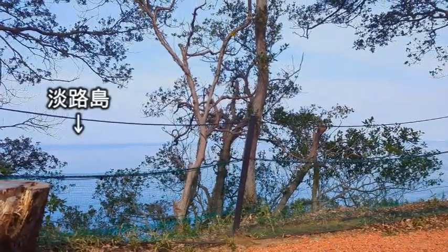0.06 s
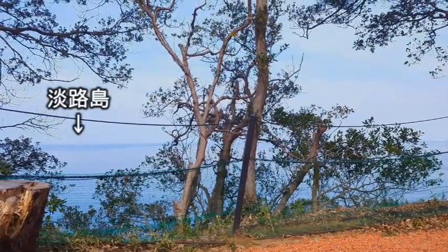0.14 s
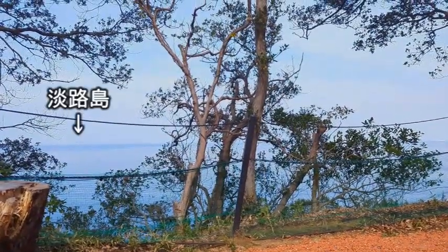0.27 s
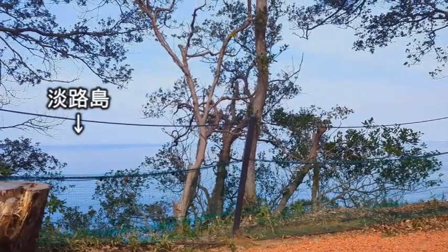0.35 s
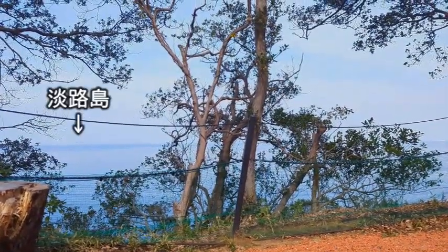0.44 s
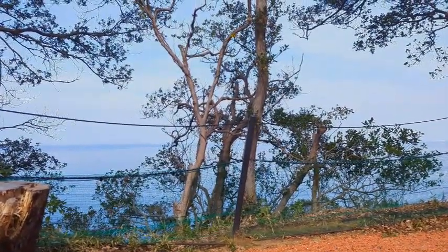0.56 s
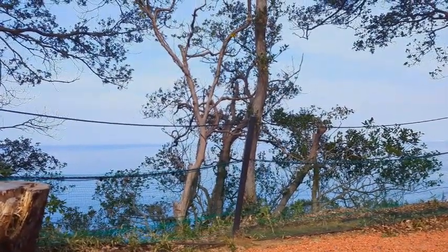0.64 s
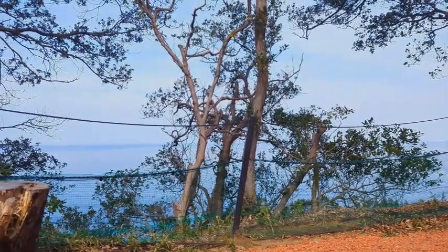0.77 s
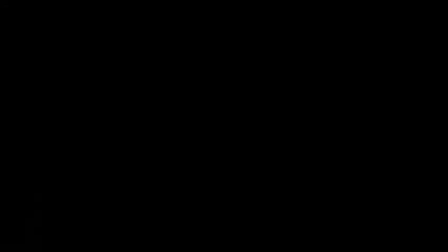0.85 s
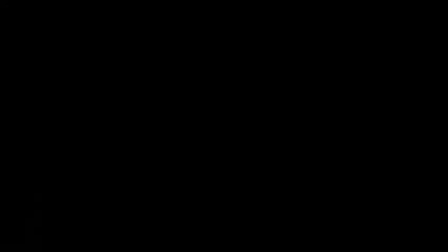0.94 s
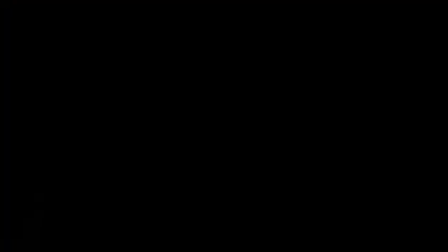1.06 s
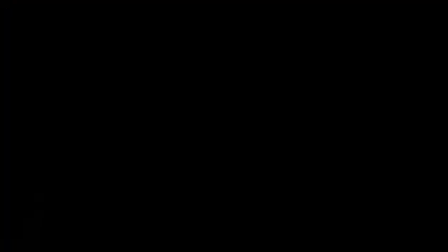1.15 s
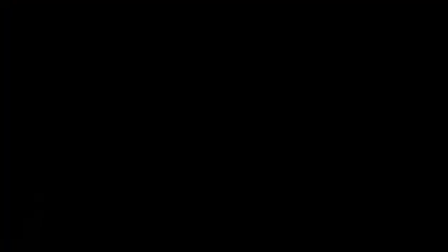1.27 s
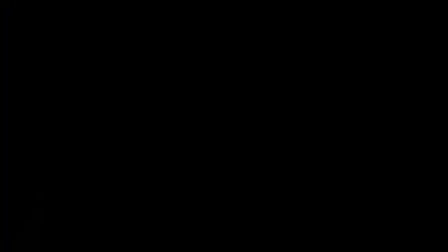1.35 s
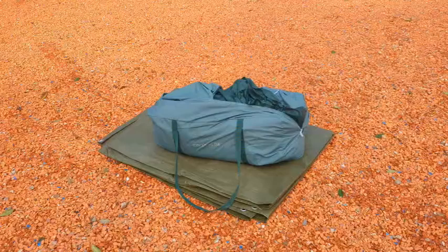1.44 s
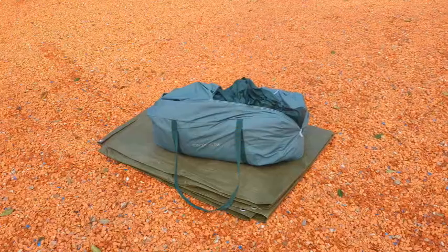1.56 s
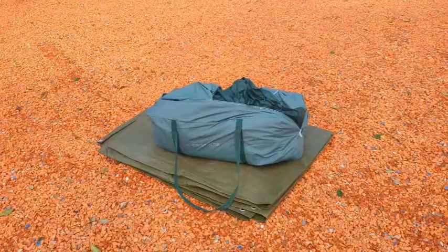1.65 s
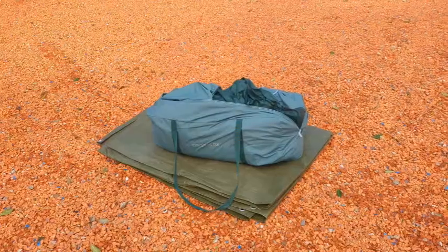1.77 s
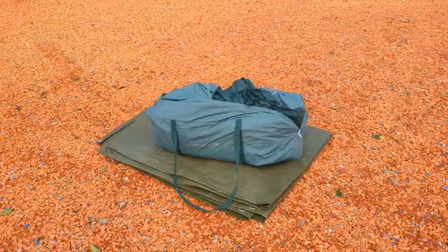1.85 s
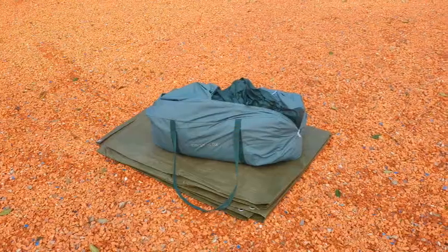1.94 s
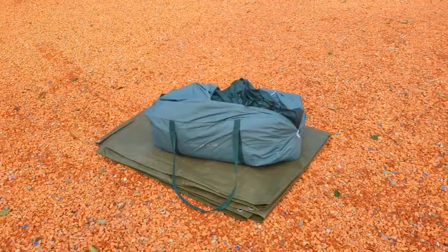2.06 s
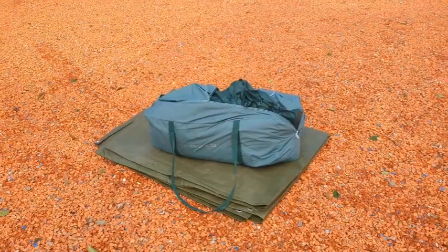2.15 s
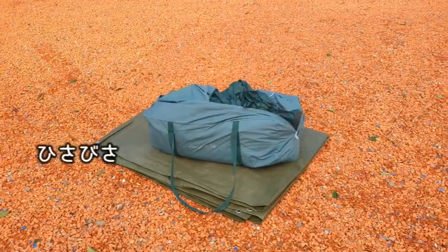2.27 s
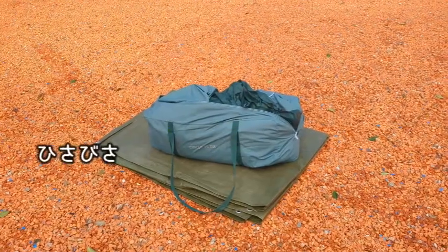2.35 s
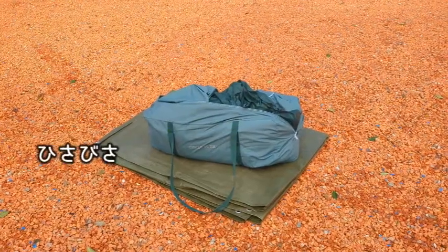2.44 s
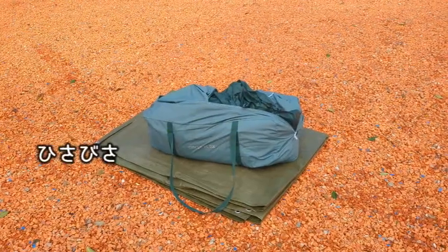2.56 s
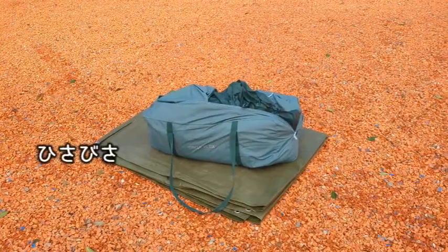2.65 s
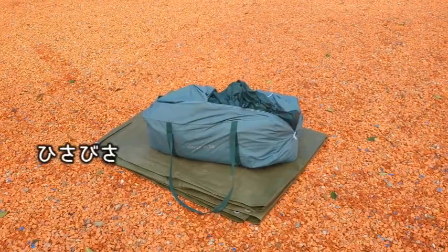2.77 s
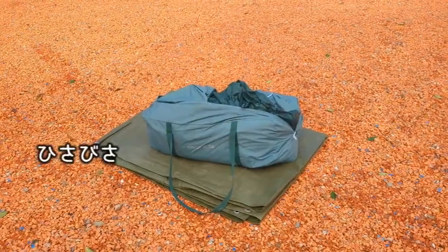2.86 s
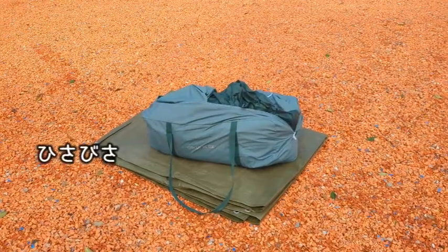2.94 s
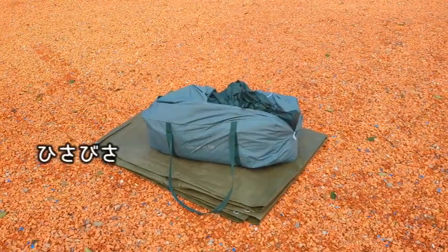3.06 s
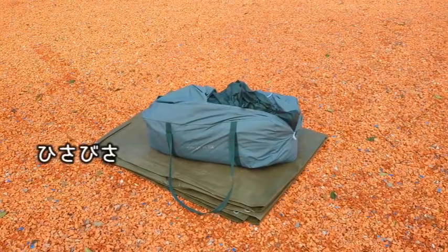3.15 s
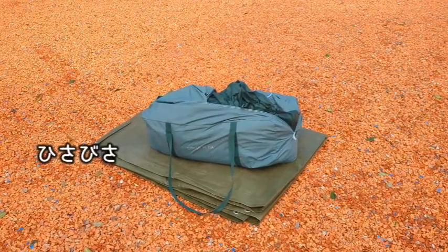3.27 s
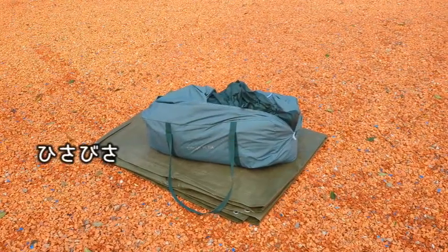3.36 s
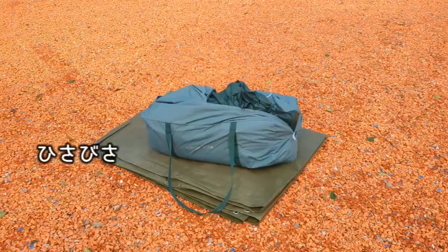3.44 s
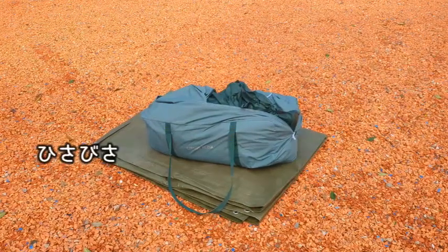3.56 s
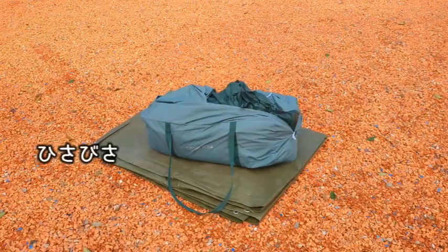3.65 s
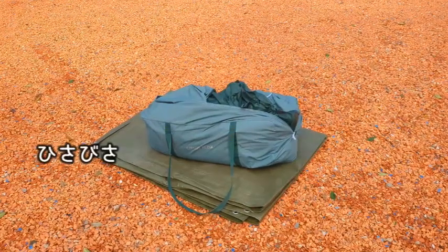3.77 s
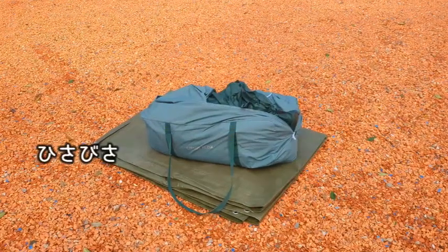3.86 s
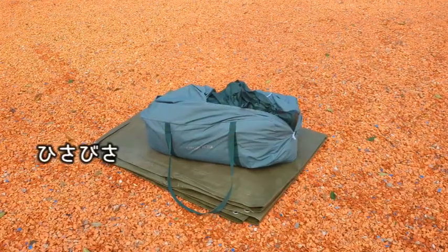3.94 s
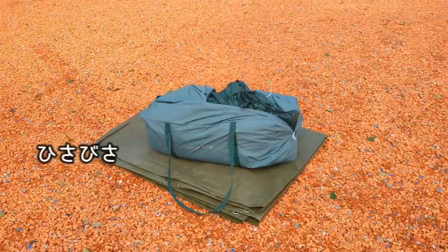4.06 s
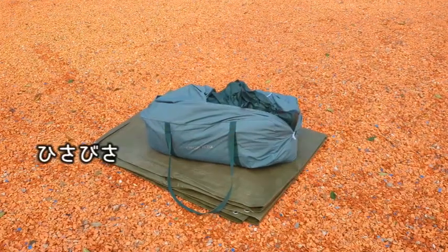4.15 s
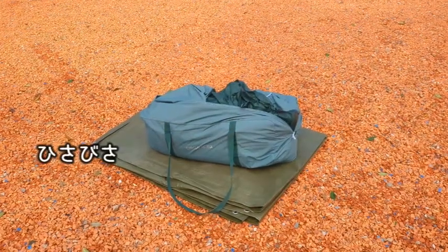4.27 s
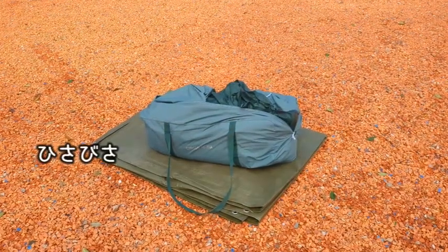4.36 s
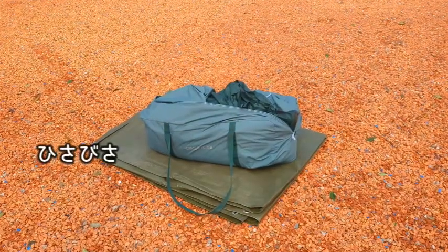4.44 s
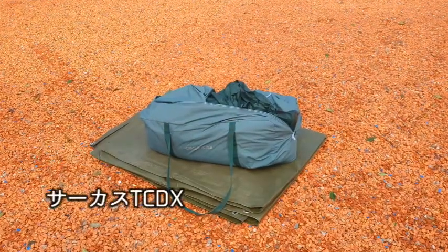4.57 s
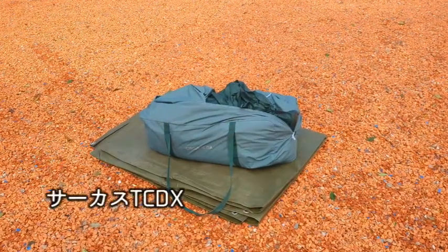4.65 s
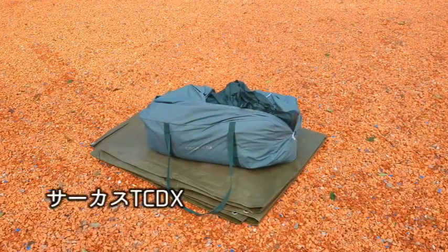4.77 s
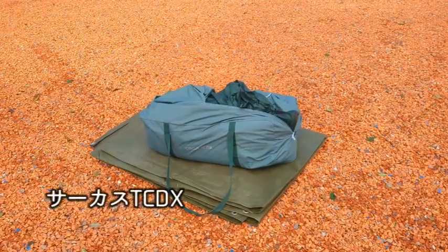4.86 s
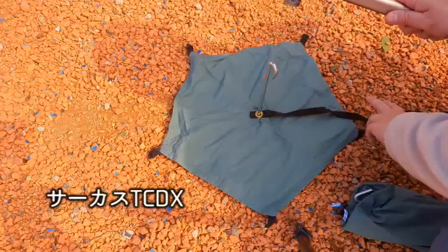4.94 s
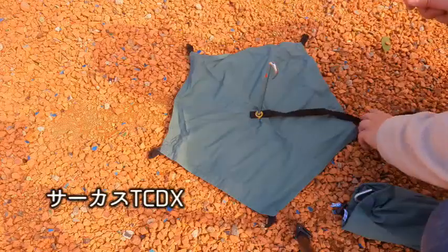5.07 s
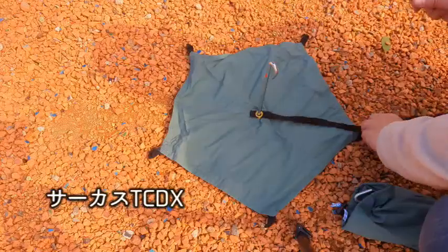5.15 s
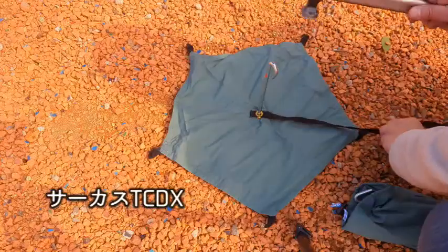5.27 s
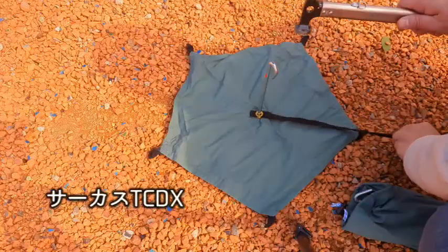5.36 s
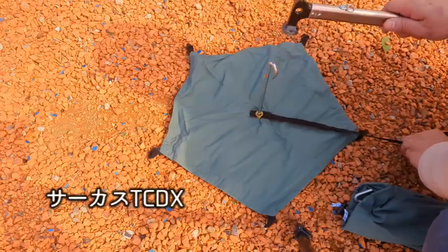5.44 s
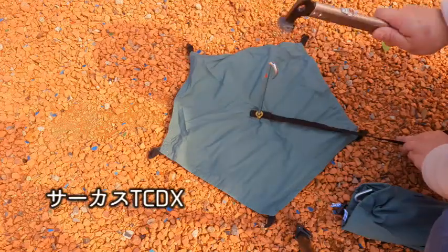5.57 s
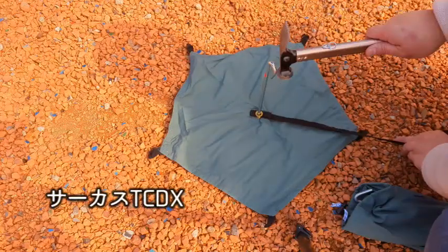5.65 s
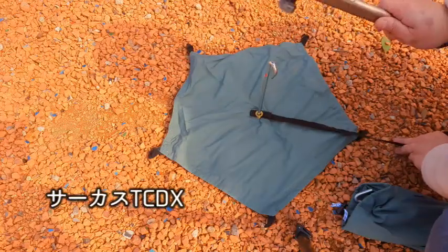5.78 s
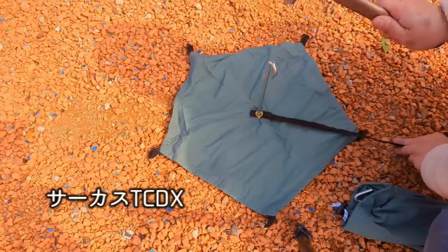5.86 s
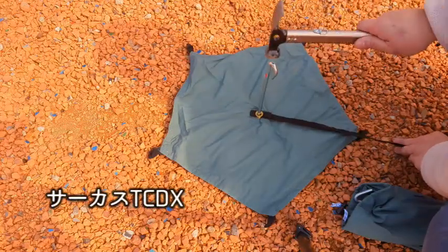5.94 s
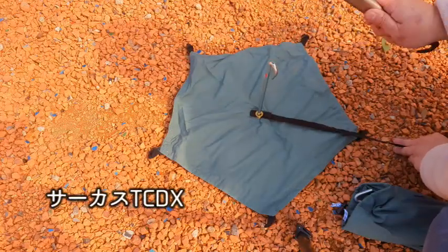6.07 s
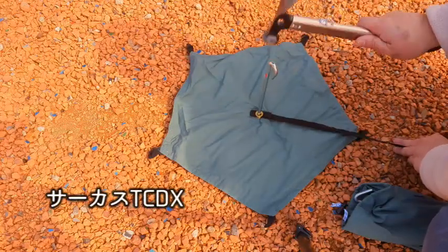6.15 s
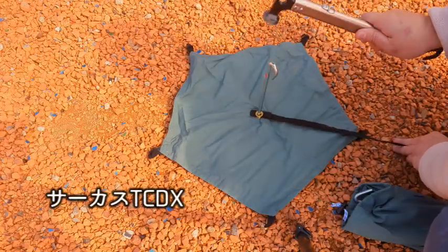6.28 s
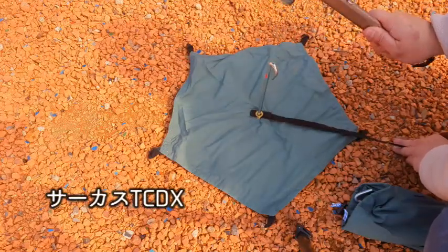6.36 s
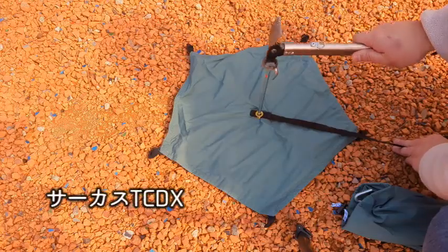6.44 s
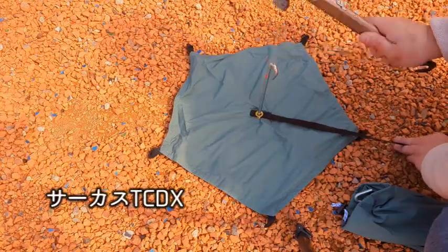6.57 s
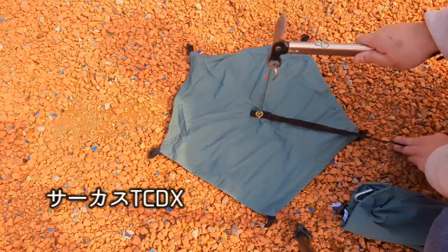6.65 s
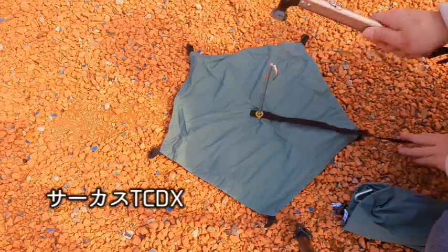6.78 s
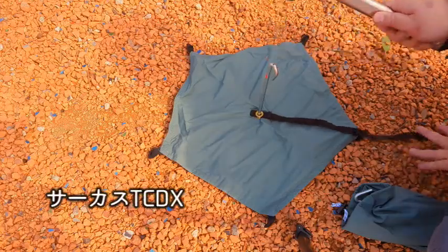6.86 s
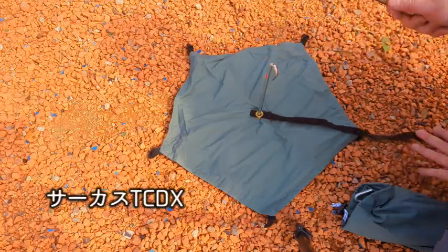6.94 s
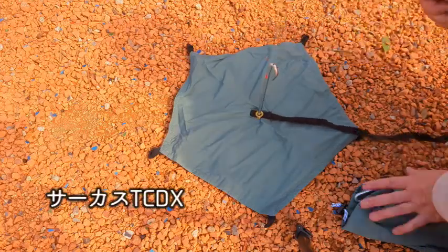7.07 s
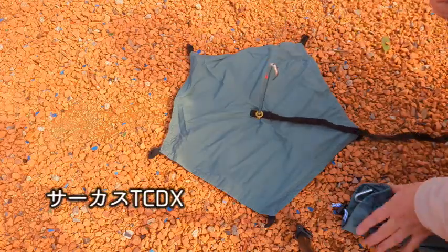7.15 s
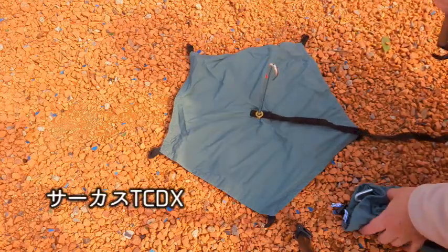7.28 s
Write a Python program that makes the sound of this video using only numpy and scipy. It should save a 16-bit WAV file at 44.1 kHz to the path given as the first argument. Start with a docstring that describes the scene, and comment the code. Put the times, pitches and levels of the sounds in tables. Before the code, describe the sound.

A steel hammer drives a tent peg into gravel with five quick ringing clinks, after a low distant engine hum and soft knocks outdoors.

```python
"""Pitching a tent by the sea

Distant air, a short silence, then a low engine drone with a few soft knocks and faint far-off hoots.
A steel hammer touches a tent peg once and drives it into gravel with five blows. The peg's ring is
choked as it sinks, while the hard ping of the steel grows. Ground and trees scatter each clink,
pebbles tick, and a strap rustles over the gravel."""
import sys
import numpy as np
from scipy import signal
from scipy.fft import rfft, irfft
from scipy.io import wavfile

SR = 44100
rng = np.random.default_rng(int(sys.argv[2]) if len(sys.argv) > 2 else 0)


def file_out(sig):
    """Save sig as 16-bit WAV at sys.argv[1]."""
    # one column per channel
    cols = np.atleast_2d(sig).T
    # limit, then scale
    lim = np.clip(cols, -1, 1)
    pcm = np.round(lim * 32767).astype(np.int16)
    wavfile.write(sys.argv[1], SR, pcm)


N = 322371
TIME = np.arange(N) / SR
AGE = np.arange(int(.7 * SR)) / SR  # seconds since a hit

# The noise of steel meeting steel. Each row: frequency in Hz, level in dB.
STEEL_CRACK = [(1200, -15.5), (2000, -11.5), (3200, 2.5), (4500, -2), (5300, 6.5), (5800, -5), (6600, 0),
               (8700, 0.5), (9700, -8), (13500, -7.5), (15000, -8.5), (16000, -13)]
# The noise of stones jolted around the peg. Each row: frequency in Hz, level in dB.
STONE_CRUNCH = [(100, -16), (270, 1), (400, -1), (570, -5.5), (1000, 0.5), (1270, -3.5), (1600, -0.5),
                (2300, -15), (5000, -12.5)]


def undb(db):
    """Turn decibels into a number to multiply by."""
    return 10 ** (np.asarray(db) / 20)


def between(ends, share):
    """The value a share of the way from the first end to the second."""
    return ends[0] + (ends[1] - ends[0]) * share


def flicker(rate):
    """A random wander of size about 1 that turns rate times a second."""
    return np.interp(TIME * rate, np.arange(N), rng.standard_normal(N))


def fade(t60):
    """Die away after a hit, by 60 dB in t60 seconds."""
    return np.exp(-np.log(1000) * AGE / t60)


def span(start, end, rise, fall):
    """Fade in from start and be silent again at end, all in seconds."""
    return np.clip((TIME - start) / rise, 0, 1) * np.clip((end - TIME) / fall, 0, 1)


def swell(start, length, rise_share=.44, release_s=.013):
    """Build up over a share of the length, hold, then die away."""
    build = np.clip((TIME - start) / (rise_share * length), 0, 1)
    return build * np.exp(-np.maximum(TIME - start - length, 0) / release_s)


def add(out, start, sound):
    """Mix a short sound into out at start seconds."""
    i = int(start * SR)
    out[:, i:i + len(AGE)] += sound[..., :N - i]


def colour(points, hz):
    """How strong a frequency is on a curve drawn through (Hz, dB) points."""
    point_hz, db = np.transpose(points)
    return undb(np.interp(np.log(hz + 1), np.log(point_hz), db))


def tint(x, points):
    """Filter a sound to the colour of the (Hz, dB) points."""
    size = x.shape[-1]
    cepstrum = irfft(np.log(colour(points, np.fft.rfftfreq(size, 1 / SR))), size)
    # fold the filter forward in time, so nothing sounds before the hit
    cepstrum[1:size // 2] *= 2
    cepstrum[size // 2:] = 0
    return irfft(rfft(x) * np.exp(rfft(cepstrum)), size)


def noise(points, bass_spread=.1, apart_hz=2500):
    """Steady coloured noise of size 1; left and right are alike in the bass, unrelated in the treble."""
    hz = np.fft.rfftfreq(N, 1 / SR)
    mid, side = rfft(rng.standard_normal((2, N)))
    spread = np.clip(hz / apart_hz, bass_spread, 1)
    stereo = mid + np.array([[1], [-1]]) * spread * side
    x = irfft(stereo * colour(points, hz), N)
    return x / x.std()


def burst(points, t60, spread):
    """A short flurry of contacts, coloured by what is struck; spread sets the stereo width."""
    mid, side = rng.standard_normal((2, len(AGE))) * fade(t60)
    flurry = (mid + np.array([[spread], [-spread]]) * side) / np.hypot(1, spread)
    gains = colour(points, np.fft.rfftfreq(len(AGE), 1 / SR))
    return tint(flurry, points) / np.sqrt(np.mean(gains ** 2))


def air():
    """Low rumble and a faint hush of sea and leaves: at the shore, at the tent site, then at the peg."""
    # The colour of the air at each spot. Each row: frequency in Hz, relative level in dB.
    shore_colour = [(15, -51), (25, -43), (42, -8), (66, 0), (95, -9), (131, -3.5), (172, -22.5),
                    (243, -25.5), (335, -32.5), (673, -39.5), (729, -42.5), (1580, -44.5), (1910, -41.5),
                    (5280, -53), (15000, -73.5)]
    site_colour = [(20, -46), (30, -15), (42, -9), (58, 8.5), (80, -5), (120, -2.5), (170, -13), (300, -26),
                   (600, -37.5), (1300, -43), (2300, -42.5), (3200, -50), (6000, -56), (10000, -64.5),
                   (15000, -70.5)]
    peg_colour = [(20, -38.5), (30, -21), (42, -5), (60, 10.5), (85, -1), (120, 6), (180, -18),
                  (300, -23.5), (600, -31), (1300, -38), (2500, -38.5), (4500, -44.5), (9000, -49),
                  (15000, -58.5)]
    shore = undb(-46.5) * noise(shore_colour, bass_spread=.31)
    site = leaves() + undb(-44) * noise(site_colour, bass_spread=.39)
    peg = undb(-46) * noise(peg_colour, bass_spread=.28)
    shore *= span(-.0091, .85, rise=.011, fall=.0057)
    site *= span(1.45, 4.91, rise=.099, fall=.023)
    peg *= span(4.87, 7.5, rise=.029, fall=.02)
    return (shore + site + peg) * undb(.5 * flicker(rate=6))


def leaves(rise_s=.17, fall_s=.33):
    """Gusts stir the leaves; each rises quickly and dies away slowly."""
    # The hiss of leaves. Each row: frequency in Hz, level in dB.
    leaf_colour = [(1000, -24.5), (1900, -2), (2300, 1), (2650, -3), (3100, -19.5), (8000, -34.5)]
    # Gusts of wind. Each row: time of the peak in seconds, level in dB.
    gusts = [(1.5, -74), (2.401, -74), (3.85, -74.5)]
    wind = 0
    for peak, db in gusts:
        width = np.where(TIME < peak, rise_s, fall_s)
        wind += undb(db) * np.exp(-((TIME - peak) / width) ** 2 / 2)
    return wind * noise(leaf_colour)


def engine(firing_hz=(93.85, 91.8), second_db=(-15.5, -26.5), whine_hz=745):
    """A distant engine slows a little: a hum at its firing rate, one an octave up, and a thin whine."""
    # The hum's level, which dips briefly midway. Each row: time in seconds, level in dB.
    levels = [(1.55, -36.5), (3.17, -42.5), (3.21, -51), (3.29, -44.5), (4.35, -36), (4.85, -43)]
    level_db = np.interp(TIME, *np.transpose(levels))
    slowed = np.interp(TIME, (2.126, 3.2), (0, 1))  # moves each pair of settings from first to second
    phase = 2 * np.pi * np.cumsum(between(firing_hz, slowed)) / SR
    phase = phase + np.array([[0], [.11]])  # the right side is slightly ahead
    second = undb(between(second_db, slowed) + 2 * flicker(rate=21)) * np.sin(2 * phase)
    hum = np.sqrt(2) * undb(level_db + .55 * flicker(rate=9)) * (np.sin(phase) + second)
    whine_gain = undb(-78 + .82 * flicker(rate=11))
    whine = whine_gain * np.sin(2 * np.pi * np.cumsum(whine_hz + 9 * flicker(rate=17)) / SR)
    return (hum + whine) * span(1.45, 4.92, rise=.088, fall=.13)


def knock(points, t60, brightness_db=0, thud_hz=260):
    """A short rattle of contacts, tilted by brightness_db for each octave above the thud."""
    tilted = [(hz, db + brightness_db * np.log2(hz / thud_hz)) for hz, db in points]
    mid, side = rng.standard_normal((2, len(AGE))) * fade(t60)
    return tint(mid + np.array([[.5], [-.5]]) * side, tilted)


def thump(sweep_s, start_hz, end_hz, peak_sweeps):
    """A bass pulse that swells while its pitch drops, loudest after peak_sweeps times sweep_s."""
    hz = end_hz + (start_hz - end_hz) * np.exp(-AGE / sweep_s)
    progress = AGE / (peak_sweeps * sweep_s)
    return np.sin(2 * np.pi * np.cumsum(hz) / SR) * progress * np.exp(1 - progress)


def gear():
    """Camping gear is knocked softly, with a few heavy bumps close by; harder contacts are brighter."""
    # Soft knocks. Each row: start in seconds, level in dB, brightness in dB per octave.
    knocks = [(1.517, -35.5, -4.5), (1.562, -22.5, 0.1), (1.592, -46, 3), (1.666, -47, 3.5),
              (1.943, -47, 1), (1.985, -27, -6), (2.63, -56.5, 5), (2.679, -36, -8), (2.705, -40, -5.5),
              (3.483, -41, 0), (3.797, -47.5, 1.5), (4.151, -45, -0.5), (4.732, -44.5, .5),
              (7.129, -54.5, 7)]
    # The dull thud of a knock. Each row: frequency in Hz, level in dB.
    knock_colour = [(60, 7.5), (260, 20.5), (700, 2.5), (1200, -11), (2400, -9.5), (8500, -43),
                    (16000, -52)]
    # Heavy bumps. Each row: start in seconds, level in dB.
    bumps = [(1.565, -23), (1.985, -34), (2.701, -34.5)]
    out = np.zeros((2, N))
    for start, db, brightness_db in knocks:
        add(out, start, undb(db) * knock(knock_colour, t60=.03, brightness_db=brightness_db))
    bump = thump(sweep_s=.016, start_hz=150, end_hz=50.2, peak_sweeps=1.32)
    for start, db in bumps:
        add(out, start, undb([[db - 3], [db + 3]]) * bump)  # louder on the right
    return out


def hoots(waver_hz=8):
    """Soft, nearly pure calls swell and fade in the distance."""
    # Far-off calls. Each row: start in seconds, length in seconds, pitch in Hz, level in dB.
    calls = [(3.048, .05, 445, -62), (3.146, 0.057, 450, -67), (6.045, 0.026, 545, -62),
             (6.836, 0.093, 405, -64)]
    out = 0
    for start, length, hz, db in calls:
        phase = 2 * np.pi * np.cumsum(hz + waver_hz * flicker(rate=33)) / SR
        out += undb(db) * swell(start, length) * np.sin(phase)
    return out


def clink(range_db, grip_s, ring_stretch=1.073, choke_db=-13, choke_s=.02):
    """Steel hits steel with a ring and a crack; where the face lands sets how loud each range is."""
    # The centres of five ranges in Hz: peg tone, clank, overtone, ping, top ping.
    range_hz = [2643, 3150, 5250, 8300, 14700]
    # Peg and hammer ring together; the peg bends two ways, so its tone is a pair. Each row: pitch in Hz,
    # level in dB, fade time in seconds before ring_stretch, left minus right in dB.
    steel_tones = [(2640, -2, .42, -10), (2647, -13, .3, -4), (1900, -25, .08, 0), (4215, -13, .05, 0),
                   (3034, -5, .05, 2), (3137, 1, .052, 2), (3184, -13, .11, 2), (3678, -6, .055, 0),
                   (5210, 0, .05, -3), (5285, -6, .1, -6), (5923, -18, .06, 0), (7430, -14, .05, 0),
                   (6480, -3, .02, 0), (6860, -5, .022, 0), (8000, -4, .02, 3), (8990, -8, .025, 0),
                   (11580, -15, .035, 0), (8303, 0, .025, 3), (8557, 1, .025, 2), (8530, -27, .28, 2),
                   (13323, -16, .045, 0), (14662, 3, .035, 1), (14680, -25, .18, 0), (14840, -6, .028, 0),
                   (15334, -7, .033, 0)]
    strength = list(zip(range_hz, range_db))
    ring = 0
    for hz, db, t60, pan_db in steel_tones:
        hz += .5 * rng.standard_normal() / t60  # the most damped tones shift most from blow to blow
        # higher tones reach the two ears more out of step
        phase = 2 * np.pi * rng.random((2, 1)) * min((hz / 9000) ** 3, 1) + np.array([[0], [1]])
        gain = undb(db + np.array([[pan_db], [-pan_db]]) / 2) * colour(strength, hz)
        ring += gain * np.sin(2 * np.pi * hz * AGE + phase) * fade(t60 * ring_stretch)
    # the gravel closes on the shaft and chokes its ring
    grip = undb(choke_db * np.clip((AGE - grip_s) / choke_s + .5, 0, 1))
    crack = tint(burst(STEEL_CRACK, t60=.021, spread=1), strength[1:])
    return undb(3) * ring * grip, undb(11.5) * crack


def shaft_knock(hz):
    """The peg's shaft knocks against the soil, which stops it within a few cycles."""
    # The shaft's tones. Each row: multiple of its pitch, level in dB.
    shaft_tones = [(1.002, -1.5), (1.199, -1), (1.5, -2.5)]
    phase = 2 * np.pi * hz * AGE
    return sum(undb(db) * np.sin(multiple * phase) for multiple, db in shaft_tones) * fade(t60=.017)


def scatter(sound, tail_t60=.43, early_t60=.14, trees_s=.051):
    """Countless weak echoes from stones and plants, nearest first, with a cluster from a row of trees."""
    trees = undb(-8) * np.exp(-((AGE - trees_s) / .012) ** 2)
    sizes = rng.standard_normal((2, len(AGE))) * undb(4 * flicker(rate=830)[:len(AGE)])
    echoes = sizes * (fade(tail_t60) + undb(-3) * fade(early_t60) + trees) * (AGE > .004)
    echoes /= np.sqrt(np.sum(echoes ** 2) / 2)
    scattered = signal.fftconvolve(sound, echoes, axes=1)[:, :N]
    # small stones and leaves throw back mostly treble
    return tint(scattered, [(500, -1), (2600, 6.5), (4500, -1.5), (8000, -1), (15000, -2.5)])


def hammering(contact_s=.001):
    """Each blow rings the steel, knocks the shaft, crunches the gravel and thumps the ground."""
    # Hammer blows. Each row: start in seconds, force in dB, looseness of the peg from 0 to 1, levels of
    # peg tone, overtone and crunch in dB, seconds until the gravel grips, echo level in dB.
    blows = [(4.8853, -50, 0.8, -40.5, -93, -51, .09, -9), (5.643, -2, 0.99, -21.5, -30, -22.5, .062, -5.5),
             (5.9345, 0, 0.23, -25.5, -22, -32, 0.096, -2),
             (6.1805, -0.5, 0.05, -38.5, -31, -30, 0.14, 2.5),
             (6.418, -0.5, 0.02, -32.5, -18.5, -31.5, .11, 2.5),
             (6.657, -2.5, 0.04, -38.5, -30, -32, .135, 3)]
    direct, to_echo = np.zeros((2, 2, N))
    for start, force_db, loose, tone_db, overtone_db, crunch_db, grip_s, echo_db in blows:
        # each pair is (firm, loose): a firm peg pings and thumps, a loose one clanks and knocks
        clank_db = force_db + between((-27.5, -13.5), loose)
        ping_db = force_db + between((-18, -16), loose)
        top_ping_db = force_db + between((-12.5, -39), loose)
        shaft_db = force_db + between((-27.5, -13.5), loose)
        thump_db = force_db + between((-29.5, -32.5), loose)
        ring, crack = clink([tone_db, clank_db, overtone_db, ping_db, top_ping_db], grip_s)
        shaft = undb(shaft_db) * shaft_knock(hz=between((270, 563), loose))
        ground = shaft + undb(crunch_db + 5) * burst(STONE_CRUNCH, t60=.03, spread=.15)
        thud = undb(thump_db) * thump(sweep_s=.016, start_hz=213, end_hz=48.26, peak_sweeps=1.02)
        thrown = undb(-20) * ring + undb(-16) * crack + undb(-19.5) * ground
        add(direct, start, thud)
        add(direct, start + contact_s, ring + crack + ground)  # once the hammer face has pressed home
        add(to_echo, start + contact_s, undb(echo_db) * thrown)
    return direct + rebounds() + scatter(to_echo)


def pebbles():
    """Pebbles tick beside the peg."""
    # Pebble ticks. Each row: start in seconds, level in dB.
    ticks = [(4.909, -60), (5.229, -62), (5.242, -60.5), (5.303, -66), (5.341, -63)]
    # The bright click of a pebble. Each row: frequency in Hz, level in dB.
    pebble_colour = [(500, -12), (3000, -13), (6500, 7), (11000, -1), (16000, -6)]
    out = np.zeros((2, N))
    for start, db in ticks:
        add(out, start, undb(db) * knock(pebble_colour, t60=.025))
    return out


def strap_rustle(catch_db=3.5):
    """A strap is drawn over the gravel in short pulls, and both drag in small uneven catches."""
    # Short pulls. Each row: start in seconds, length in seconds, gravel level in dB, strap level in dB.
    pulls = [(5.02, 0.0082, -61, -75), (5.135, .012, -57.5, -64.5), (5.154, 0.017, -64, -72),
             (5.187, .03, -71, -68), (6.885, 0.34, -68.5, -84.5), (7.219, 0.11, -60, -59)]
    # Shifting gravel and the sliding strap. Each row: frequency in Hz, level in dB.
    gravel_colour = [(300, -36), (800, -3), (1200, 2.5), (1900, -5.5), (3000, -9), (5000, -22),
                     (12000, -42)]
    strap_colour = [(1000, -16), (4000, -13.5), (8000, 1), (11000, -7), (15000, -4)]
    gravel = undb(catch_db * flicker(rate=220))
    strap = undb(catch_db * flicker(rate=260))
    gravel = gravel * noise(gravel_colour)
    strap = strap * noise(strap_colour)
    return sum(swell(start, length) * (undb(gravel_db) * gravel + undb(strap_db) * strap)
               for start, length, gravel_db, strap_db in pulls)


def rebounds():
    """The hammer drops back or the peg slips just after a blow."""
    # Small after-hits. Each row: start in seconds, steel level in dB, crunch level in dB.
    hits = [(5.655, -22, -29.5), (5.697, -64, -52), (5.705, -50, -64.5), (6.431, -36.5, -29.5),
            (6.446, -37.5, -32.5)]
    out = np.zeros((2, N))
    for start, steel_db, crunch_db in hits:
        add(out, start, undb(steel_db) * burst(STEEL_CRACK, t60=.052, spread=.34))
        add(out, start, undb(crunch_db) * burst(STONE_CRUNCH, t60=.05, spread=.15))
    return out


def scene():
    """Hammer and gear over the open air; the background leans slightly right."""
    close_by = hammering() + gear() + pebbles() + strap_rustle()
    background = air() + engine() + hoots()
    return close_by + background * undb([[-.35], [.35]])


def record(dry, top_hz=15900):
    """Round off the highest peaks and cut the very top of the treble."""
    low_pass = signal.ellip(8, .2, 70, top_hz, fs=SR, output="sos")
    return signal.sosfilt(low_pass, np.tanh(dry))


dry = scene()
out = record(dry)
file_out(out)
```